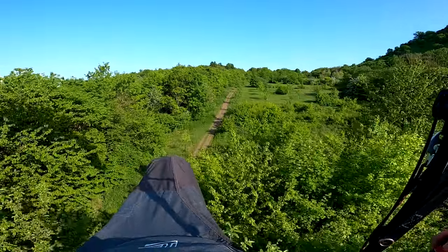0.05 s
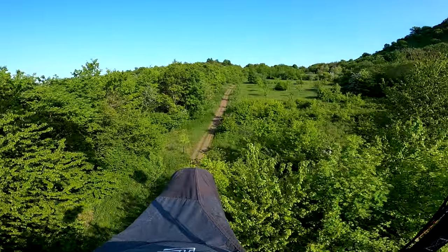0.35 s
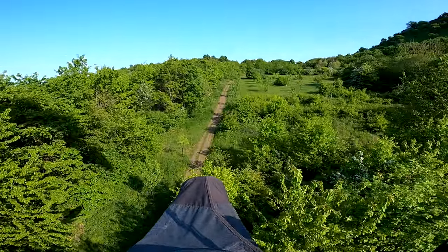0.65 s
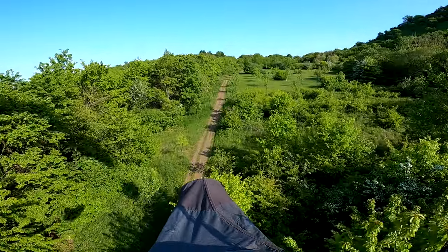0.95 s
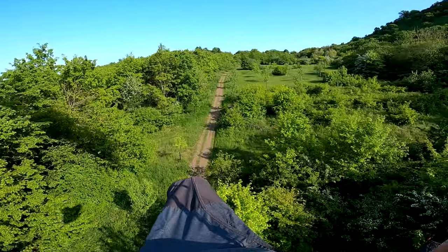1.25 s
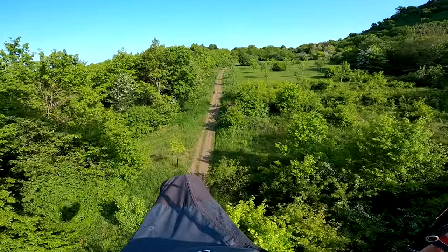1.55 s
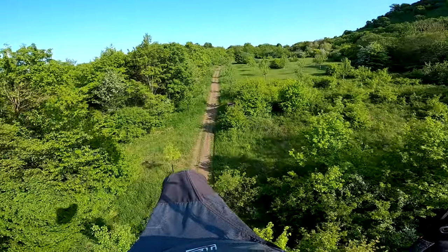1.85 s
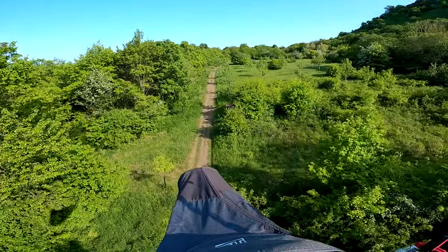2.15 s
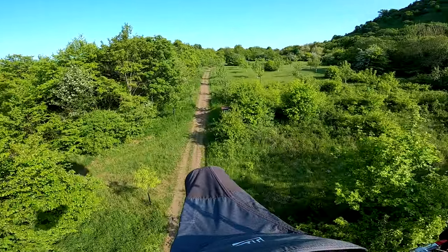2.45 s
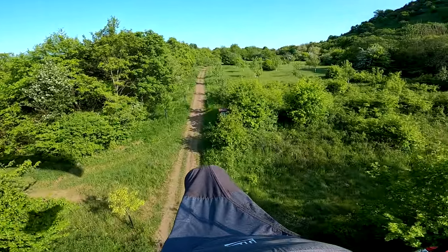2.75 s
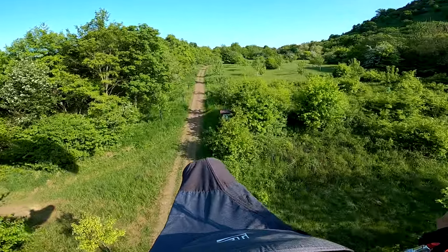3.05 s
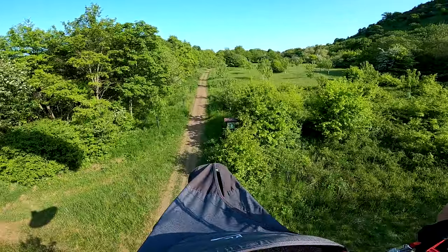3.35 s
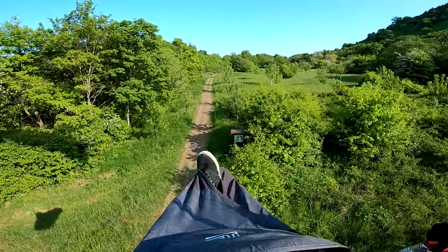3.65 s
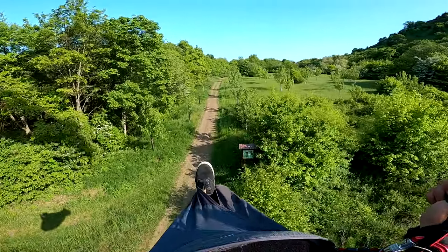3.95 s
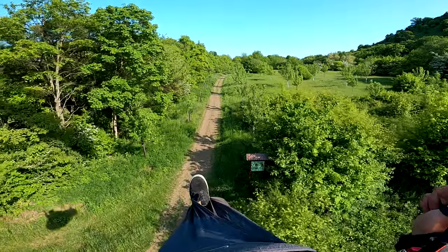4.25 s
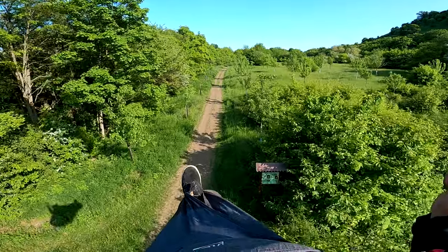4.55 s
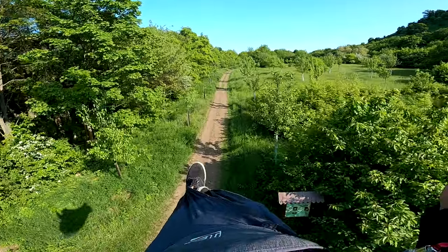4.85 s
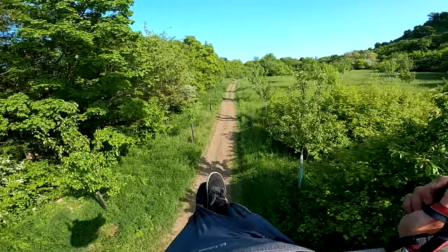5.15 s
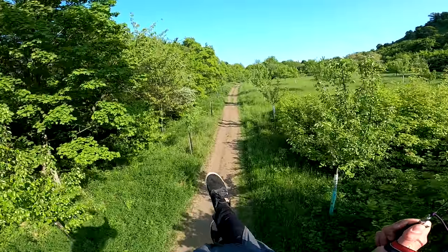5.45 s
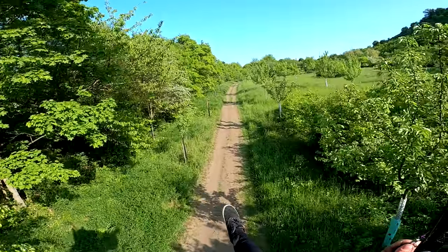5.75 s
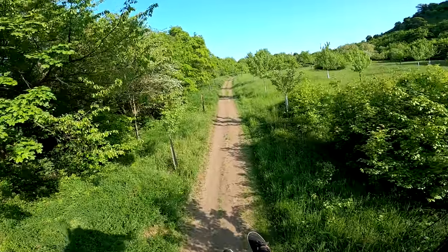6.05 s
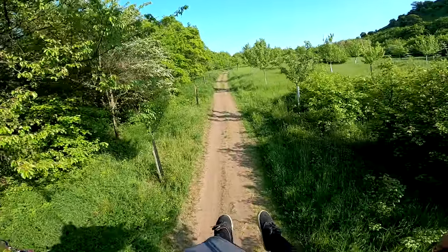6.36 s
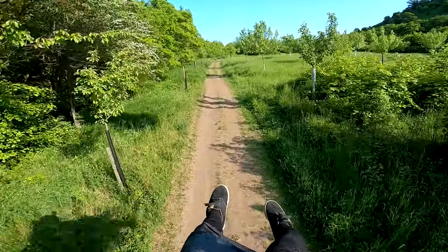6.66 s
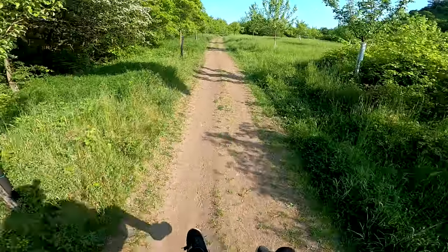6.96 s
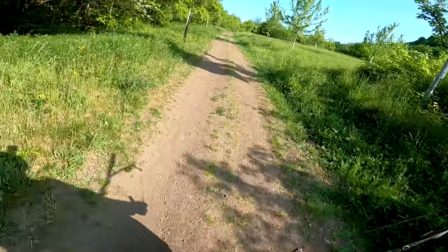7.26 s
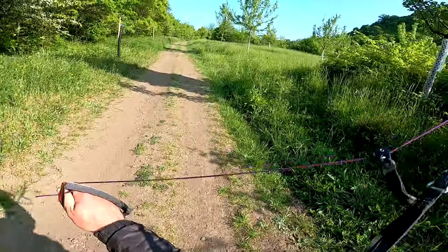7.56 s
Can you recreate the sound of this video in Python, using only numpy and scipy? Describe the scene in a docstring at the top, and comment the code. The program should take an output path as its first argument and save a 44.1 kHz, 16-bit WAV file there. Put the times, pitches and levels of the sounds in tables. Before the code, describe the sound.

Wind buffets the microphone of a low-flying paraglider, a bird chirping faintly, until harness rustling and close scuffs and bumps mark the landing.

```python
"""Wind buffets and rushes past a camera microphone worn by a paraglider pilot, low over bushes.
Eddies pump the microphone port; right beside it clothes swish, straps rasp and fittings tick.
A small bird sings faintly from the foliage below. Coming in to land on a dirt track, the pilot slides
out of the harness seat and touches down: the gear bumps and scuffs close up, and stones crunch."""
import sys
import numpy as np
from scipy import signal
from scipy.fft import rfft, irfft, next_fast_len
from scipy.io import wavfile
from scipy.ndimage import uniform_filter1d, map_coordinates

SR = 44100
rng = np.random.default_rng(int(sys.argv[2]) if len(sys.argv) > 2 else 0)


def file_out(sig):
    """Save sig as 16-bit WAV at sys.argv[1]."""
    # one column per channel
    cols = np.atleast_2d(sig).T
    # limit, then scale
    lim = np.clip(cols, -1, 1)
    pcm = np.round(lim * 32767).astype(np.int16)
    wavfile.write(sys.argv[1], SR, pcm)


N = 335601

# pressure of the flow on the microphone port: (time [s], level [dB])
BUFFET_LEVELS = [(0.0, -33), (0.55, -35.5), (0.85, -26), (1.15, -22.5), (1.6, -23.5), (1.85, -20.5),
                 (4.1, -20.5), (4.45, -27.5), (4.69, -28), (4.82, -25.5), (4.93, -25), (5.01, -23),
                 (5.09, -22), (5.15, -32), (5.19, -22.5), (5.25, -29.5), (5.42, -30.5), (5.75, -24.5),
                 (6.0, -27), (6.15, -22), (6.93, -23), (7.06, -29), (7.22, -22.5), (7.61, -28)]
# air passing the pilot: (time [s], rush [dB], wake of the body [dB])
AIR_LEVELS = [(0.0, -47.5, -49), (0.35, -46.5, -45.5), (0.72, -40, -43.5), (1.0, -40, -39),
              (1.22, -35, -34.5), (1.55, -36, -35.5), (1.95, -33.5, -36.5), (2.35, -36.5, -40),
              (2.85, -34.5, -44), (3.5, -37.5, -45.5), (4.08, -39, -45), (4.4, -42, -41.5),
              (5.05, -39.5, -37), (5.5, -39, -35), (5.8, -37, -39), (6.1, -44, -37)]
# hiss of that air: (time [s], level [dB])
HISS_LEVELS = [(0.0, -58.5), (0.35, -59.5), (1.25, -53), (1.65, -52), (1.9, -47), (2.4, -49.5),
               (3.4, -50.5), (4.05, -50.5), (4.4, -53.5), (6.1, -52.5)]
# rougher air that stirs up the eddies: (centre [s], gain [dB], half length [s])
ROUGH_AIR = [(1.3, 3.5, 0.2), (1.794, 10, 0.05), (2.596, 6, 0.16), (3.15, 6.5, 0.19), (3.695, 7.5, 0.18),
             (4.287, 6, 0.24), (4.84, 7.5, 0.04), (7.292, 10, 0.17)]
# sleeves and trouser legs: (peak [s], swish [dB], rise [s], fall [s], dull rub against swish [dB])
LIMB_MOVES = [(.75, -62.5, 0.11, 0.047, 11), (3.465, -53, 0.025, 0.095, 5), (3.93, -56, 0.18, 0.069, -9),
              (4.76, -62.5, 0.038, 0.03, 10.5), (4.91, -50, 0.079, 0.056, 5), (5.28, -61.5, .03, 0.07, 5),
              (5.41, -53, 0.052, 0.095, 3.5), (5.44, -46, 0.015, 0.014, -6), (5.7, -55.5, 0.16, 0.09, 8.5),
              (6.25, -58.5, 0.13, .3, 1)]
# buckles and lines: (time [s], level [dB], centre [Hz], width [Hz], t60 [s])
FITTING_TICKS = [(.821, -33.5, 2170, 1000, 0.011), (1.098, -52, 6360, 1400, .02),
                 (5.577, -45.5, 10200, 4000, .04), (5.757, -31.5, 2940, 1500, 0.018),
                 (6.648, -33.5, 4500, 5000, .015), (6.799, -24, 1650, 900, .012),
                 (6.864, -33, 5000, 4000, .025), (7.04, -28, 2500, 3000, 0.029),
                 (7.107, -30.5, 4140, 2500, .027), (7.14, -22, 2780, 3200, 0.011),
                 (7.1512, -15.5, 2670, 4200, 0.0063), (7.4373, -17, 3150, 3000, 0.009)]
# harness against the camera: (time [s], level [dB], starting pitch [Hz], t60 [s])
HARNESS_BUMPS = [(.348, -35.5, 850, 0.027), (5.607, -32, 845, .03), (7.2267, -17.5, 895, 0.016),
                 (7.3245, -11, 1040, 0.011), (7.469, -14, 624, 0.031), (7.529, -17, 840, 0.048),
                 (7.573, -16, 670, 0.04), (7.582, -14.5, 620, 0.041)]
# quick pulls of a strap: (centre [s], level [dB], half length [s])
STRAP_PULLS = [(0.723, -45, 0.02), (0.767, -41.5, 0.013), (5.448, -47, 0.018), (5.695, -44, .009),
               (5.844, -45, 0.0098), (6.355, -47, 0.02), (6.735, -40.5, .025), (6.803, -29.5, 0.018),
               (7.048, -34.5, .008)]
# big eddies on the port: (centre [s], level [dB], half length [s], pitch [Hz], puff against shake [dB])
BIG_EDDIES = [(1.23, -29.5, 0.011, 225.4, -1.5), (3.567, -23.5, 0.0022, 260, 0),
              (4.322, -17, 0.0061, 85, -11), (5.795, -11, 0.015, 99.55, -9.5),
              (5.955, -13.5, 0.0066, 85.5, -6), (6.971, -13.5, 0.014, 107.5, 0)]
# slurred notes from below: (time [s], level before the paths [dB], length [s], start [Hz], end [Hz])
BIRD_NOTES = [(1.519, -46, 0.023, 5100, 3480), (1.624, -51, 0.027, 4800, 3500),
              (1.742, -50, .024, 4400, 3170), (1.846, -44.5, .032, 4300, 3500),
              (1.948, -45, 0.025, 4600, 3300), (2.054, -42, .018, 4300, 2970),
              (2.152, -39.5, .019, 4500, 3300), (2.257, -45, .022, 4500, 3000),
              (2.277, -63, 0.1, 7950, 7300), (2.362, -44, .025, 4600, 3050), (2.475, -41, .02, 4550, 3310),
              (2.533, -48, 0.015, 5500, 4350), (2.579, -42, .028, 4400, 2820),
              (2.655, -47, 0.04, 2350, 3380), (3.384, -43, 0.027, 3140, 2900),
              (5.231, -44.5, 0.044, 3670, 3470), (5.254, -46, 0.033, 3410, 2690)]
# the body heaving in the harness: (peak [s], extra effort [dB], rise [s], fall [s], extra fizz [dB])
BODY_HEAVES = [(6.275, 1, 0.011, 0.024, 1.5), (6.37, 6.5, 0.026, .06, 1.5), (6.77, 7, 0.11, .12, -0.5),
               (7.05, 5, 0.023, 0.05, 1), (7.15, 6, 0.028, 0.046, 0.5), (7.48, 4, 0.05, 0.28, 0)]
# slips of a line: (time [s], level [dB], pitch [Hz])
LINE_SLIPS = [(7.025, -27, 7700), (7.041, -29, 8000), (7.055, -32, 7900), (7.066, -32, 8100),
              (7.087, -34, 8200)]
# gear dragged at touchdown: (time [s], level [dB], length [s], grit gain [dB])
LANDING_SCUFFS = [(7.225, -22.5, 0.036, -2.5), (7.255, -22.5, 0.028, -9.5), (7.285, -26, 0.033, 2.5),
                  (7.321, -24, 0.039, -22), (7.359, -29, 0.061, -9), (7.453, -25.5, 0.017, 1),
                  (7.466, -25, 0.022, -2), (7.488, -28, 0.033, -4.5), (7.513, -29, 0.034, -0.5),
                  (7.568, -23.5, 0.019, -3)]

# spectra of the air at the microphone: (frequency [Hz], relative level [dB])
BUFFET_SPECTRUM = [(10, -28), (22, -7), (33, 1.5), (47, 1), (70, -1), (95, -7.5), (130, -19), (220, -34.5),
                   (600, -90), (3000, -125)]
EDDY_SPECTRUM = [(50, -35.5), (85, 1.5), (110, 2), (150, -5.5), (185, -11), (260, -22.5), (600, -61),
                 (2000, -88.5), (8000, -125)]
WAKE_SPECTRUM = [(110, -17), (160, 2), (200, -0.5), (245, -1.5), (340, -3), (450, -14), (800, -37.5),
                 (2500, -61.5), (10000, -105)]
RUSH_SPECTRUM = [(180, -42.5), (320, -3), (450, 2), (700, -4), (1000, -7.5), (1500, -13), (2200, -21.5),
                 (4000, -38), (9000, -69), (13000, -100)]
HISS_SPECTRUM = [(600, -20), (1500, 3), (2200, 3), (3600, 2.5), (5000, -4.5), (6600, -11.5), (8000, -25.5),
                 (10000, -35), (12000, -58), (15000, -79.5)]
PUFF_SPECTRUM = [(60, -0.5), (170, 6.5), (300, -0.5), (500, -12), (1500, -38), (6000, -68)]
# spectra of cloth and gear, close up: (frequency [Hz], relative level [dB])
FLUTTER_SPECTRUM = [(2000, -6), (5000, 3), (8000, -1.5), (10000, -8.5), (12000, -27), (15000, -44)]  # nylon stirring in the wind
SWISH_SPECTRUM = [(500, -16.5), (1400, -6), (2200, -3), (3100, 7.5), (4300, 8), (5500, 3.5), (7000, 1.5),
                  (8200, -6), (9900, -2.5), (11500, -11), (14500, -25.5)]
CLOTH_SPECTRUM = [(600, -7.5), (1500, 3), (2200, -0.5), (2750, 4.5), (3500, 2), (5000, -5), (6600, -12.5),
                  (8000, -26), (10000, -30), (12000, -61)]  # the duller rub of cloth on cloth
WEBBING_SPECTRUM = [(500, -22), (1150, 7), (1620, 11.5), (1950, 1.5), (2750, 3), (3500, -2.5), (4300, -4),
                    (5500, -10), (9000, -14), (14000, -54)]
HARNESS_SPECTRUM = [(150, -29), (400, 2), (800, 0), (1400, 1.5), (2200, -2.5), (3500, -13.5), (6000, -32),
                    (12000, -57)]
FIZZ_SPECTRUM = [(1000, -8.5), (2600, -4.5), (4500, -2.5), (6200, -8), (8200, -14), (10000, -20),
                 (12000, -29.5), (15000, -39)]  # fine cloth noise
SCRAPE_SPECTRUM = [(50, -20), (120, 6), (230, 14), (380, 13.5), (700, 6.5), (1100, -15), (1800, -33),
                   (4000, -51)]
GRIT_SPECTRUM = [(300, -22), (900, -0.5), (1400, -1.5), (2300, -9.5), (3500, -13.5), (5500, -30),
                 (9000, -42), (14000, -53.5)]
# response of the covered microphone: (frequency [Hz], gain [dB])
MIC_RESPONSE = [(1000, 0.5), (10000, -0.5), (12000, -3), (14500, -6)]
BAND_LIMIT_HZ = 14950


def amp(db):
    """Decibels to gain."""
    return 10 ** (np.asarray(db) / 20)


def unit(x):
    """x at rms 1."""
    return x / np.sqrt(np.mean(x ** 2) + 1e-20)


def curves(rows):
    """One value per sample for each column after the time."""
    times, *columns = np.transpose(rows)
    return [np.interp(np.arange(N) / SR, times, column) for column in columns]


def swell(s, rise, fall):
    """A bell that rises to 1 at second s and falls again."""
    t = np.arange(N) / SR - s
    return np.exp(-(t / np.where(t < 0, rise, fall)) ** 2 / 2)


def wobble(rate):
    """A smooth random curve, rate knots a second."""
    return map_coordinates(rng.standard_normal(int(N * rate / SR) + 4), [np.arange(N) * rate / SR])


def filtered(x, response):
    """x times a response of frequency."""
    size = next_fast_len(len(x) + 8192)
    return irfft(rfft(x, size) * response(np.fft.rfftfreq(size, 1 / SR)), size)[:len(x)]


def coloured(x, spectrum):
    """x shaped by a spectrum table, at rms 1."""
    f, db = np.transpose(spectrum)
    return unit(filtered(x, lambda hz: amp(np.interp(np.log(hz + 1), np.log(f), db))))


def add(track, s, sound):
    """Mix a sound into the track from second s on."""
    part = track[round(s * SR):][:len(sound)]
    part += sound[:len(part)]


def steady_swings(spectrum, slack):
    """Low wind buffeting held fairly steady in strength, as by the camera's wind limiter."""
    swing = coloured(rng.standard_normal(N), spectrum)
    power = np.abs(uniform_filter1d(swing ** 2, size=3000))
    return unit(swing / np.sqrt(power + slack))  # more slack evens it less


def turbulence(spectrum, patchy_db):
    """Noise with patches of random gain in time and frequency."""
    cells = signal.stft(rng.standard_normal(N), nperseg=512)[2]
    patches = uniform_filter1d(rng.standard_normal(cells.shape), size=8, axis=0)
    patches = unit(uniform_filter1d(patches, size=12, axis=1))
    noise = signal.istft(cells * amp(patchy_db * patches), nperseg=512)[1][:N]
    return coloured(noise, spectrum)


def friction(spectrum, rate, smooth):
    """Tiny slips, rate a second, over smooth rubbing noise."""
    slips = (rng.random(N) < rate / SR) * rng.standard_normal(N)
    return coloured(unit(slips) + smooth * rng.standard_normal(N), spectrum)


def lulls(buffet_db):
    """A gain that dips as the flow lets go of the port for moments, deeper when the flow is weak."""
    depth_db = 2.5 + 0.54 * (buffet_db.max() - buffet_db)
    hold = amp(-depth_db * np.tanh(np.maximum(wobble(rate=28), 0) ** 2))
    return hold / np.sqrt(uniform_filter1d(hold ** 2, size=SR // 4))


def wind():
    """Eddies pump the microphone port, and each pressure swing roughens the rush of air."""
    buffet_db, = curves(BUFFET_LEVELS)
    rush_db, wake_db = curves(AIR_LEVELS)
    hiss_db, = curves(HISS_LEVELS)
    gust_db = sum(db * swell(s, half, half) for s, db, half in ROUGH_AIR)
    # small eddies follow the buffet's level, and gusts lift them
    eddy_db = buffet_db.mean() - 9.5 + 0.94 * (buffet_db - buffet_db.mean()) + gust_db
    swing = steady_swings(BUFFET_SPECTRUM, slack=0.1)
    flicker = wobble(rate=28)
    hold = lulls(buffet_db)
    eddies = amp(eddy_db) * unit(amp(2.36 * flicker) * steady_swings(EDDY_SPECTRUM, slack=0.73))
    wake = amp(wake_db) * unit(amp(0.98 * flicker) * turbulence(WAKE_SPECTRUM, patchy_db=0.3))
    rush = unit(amp(0.5 * flicker + 0.6 * swing) * turbulence(RUSH_SPECTRUM, patchy_db=0.84))
    hiss = unit(amp(0.5 * flicker + 0.55 * swing) * turbulence(HISS_SPECTRUM, patchy_db=1.0))
    return hold * (amp(buffet_db) * swing + eddies) + wake + amp(rush_db) * rush + amp(hiss_db) * hiss


def clothes():
    """Nylon near the microphone stirs in the wind and swishes, over a duller rub, as limbs shift."""
    nylon = friction(SWISH_SPECTRUM, rate=1500, smooth=1.4)
    dull = friction(CLOTH_SPECTRUM, rate=1500, smooth=0.99)
    rush_db, _ = curves(AIR_LEVELS)
    flutter_db = -66 + 0.18 * (rush_db - rush_db.mean())
    out = amp(flutter_db) * coloured(rng.standard_normal(N), FLUTTER_SPECTRUM)
    for s, db, rise, fall, dull_db in LIMB_MOVES:
        out += amp(db) * swell(s, rise, fall) * (nylon + amp(dull_db) * dull)
    return amp(wobble(rate=35)) * out


def fittings():
    """The camera mount gives one soft knock; buckles and lines snap within arm's reach."""
    knock_hz, knock_t60 = 385, 0.043
    t, out = np.arange(SR // 8) / SR, np.zeros(N)
    add(out, 0.113, amp(-23.5 - 60 * t / knock_t60) * np.sin(2 * np.pi * knock_hz * t))
    for s, db, hz, width, t60 in FITTING_TICKS:
        decay = amp(-60 * t / t60)
        burst = decay * rng.standard_normal(len(t))
        # a dry snap has no pitch of its own: all frequencies are struck alike
        flat_spectrum = np.exp(1j * np.angle(rfft(burst)))
        contact = np.sqrt(decay) * irfft(flat_spectrum, len(t))
        edges = np.clip([hz - width / 2, hz + width / 2], 80, BAND_LIMIT_HZ)
        tick = signal.sosfilt(signal.butter(3, edges, "bandpass", fs=SR, output="sos"), contact)
        # the blow sets the energy of the tick, whatever its fine shape
        add(out, s, amp(db) * np.sqrt(np.mean(decay ** 2)) * unit(tick))
    return out


def harness_bumps():
    """The harness bumps the camera itself: a crack, and a thud whose pitch sags as the padding gives."""
    sag_share, sag_s, crack_db, crack_t60 = 0.64, 0.0079, -16.5, 0.0086
    t, out = np.arange(SR // 16) / SR, np.zeros(N)
    sag = 1 - sag_share * (1 - np.exp(-t / sag_s))
    for s, db, hz, t60 in HARNESS_BUMPS:
        phase = 2 * np.pi * np.cumsum(hz * sag) / SR
        thud = amp(-60 * t / t60) * np.sin(phase)
        crack = amp(crack_db - 60 * t / crack_t60) * coloured(rng.standard_normal(len(t)), GRIT_SPECTRUM)
        add(out, s, amp(db) * (thud + crack))
    return out


def straps():
    """Webbing is drawn over cloth close by, and rasps as its weave catches and lets go."""
    rasp_hz, rasp_db = 66, 2.6
    speed = sum(amp(db) * swell(s, half, half) for s, db, half in STRAP_PULLS)
    catch_hz = rasp_hz * np.exp(0.25 * wobble(rate=40))
    catches = np.sin(2 * np.pi * np.cumsum(catch_hz) / SR)
    return speed * unit(amp(rasp_db * catches) * friction(WEBBING_SPECTRUM, rate=1600, smooth=0.56))


def eddy_thumps():
    """A big eddy hits the port and shakes it for a few uneven, lopsided cycles, with a puff of air."""
    out = np.zeros(N)
    puff = coloured(rng.standard_normal(N), PUFF_SPECTRUM)
    waver = np.exp(0.14 * wobble(rate=70))
    for s, db, half, hz, puff_db in BIG_EDDIES:
        phase = 2 * np.pi * np.cumsum(hz * waver) / SR
        shake = np.sin(phase) + 0.2 * np.sin(2 * phase)
        out += amp(db) * swell(s, half, half) * (shake + amp(puff_db) * puff)
    return out


def bird():
    """Down in the bushes, a run of steeply falling notes ends in a flourish; stray calls follow."""
    blur_hz, direct_gain = 70, 0.56
    ground_delay_s, ground_db, foliage_db, foliage_t60 = 0.015, -13, -8.5, 0.1
    t, out = np.arange(SR // 4) / SR, np.zeros(N)
    for s, db, length, start_hz, end_hz in BIRD_NOTES:
        progress = np.linspace(0, 1, round(length * SR))
        phase = 2 * np.pi * np.cumsum(start_hz * (end_hz / start_hz) ** progress) / SR
        # moving air smears the pitch on the way up to the microphone
        drift = filtered(rng.standard_normal(len(t)), lambda hz: np.exp(-(hz / 400) ** 2))[:len(phase)]
        phase += np.cumsum(drift) * np.sqrt(2 * np.pi * blur_hz / SR)
        note = amp(db) * np.sqrt(np.abs(np.sin(np.pi * progress))) * np.sin(phase)
        # the foliage scatters each note along new paths
        paths = rng.standard_normal(len(t)) * amp(-60 * t / foliage_t60)
        add(out, s, direct_gain * note)
        add(out, s + ground_delay_s, amp(ground_db) * note)
        add(out, s, amp(foliage_db) * signal.fftconvolve(note, paths / np.linalg.norm(paths)))
    return out


def harness_slide():
    """The pilot leaves the seat: webbing and cloth drag in jerks, harder as the leg straps take weight."""
    start_s, attack_s, effort_db_per_s = 6.24, 0.023, 4.5
    t = np.arange(N) / SR - start_s
    heave_db = sum(db * swell(s, rise, fall) for s, db, rise, fall, _ in BODY_HEAVES)
    bright_db = sum(db * swell(s, rise, fall) for s, _, rise, fall, db in BODY_HEAVES)
    effort_db = effort_db_per_s * t + heave_db
    jerk_db = wobble(rate=60)
    rub = amp(-45 + effort_db + jerk_db) * friction(HARNESS_SPECTRUM, rate=990, smooth=1.0)
    fizz_db = -45.5 + 0.55 * effort_db + bright_db + jerk_db
    fizz = amp(fizz_db) * friction(FIZZ_SPECTRUM, rate=870, smooth=2.9)
    return np.clip(t / attack_s, 0, 1) * (rub + fizz)


def line_squeaks():
    """A line slips in a few quick, high squeaks just before touchdown."""
    half_width_hz, attack_s, t60 = 750, 0.0027, 0.026
    t, out = np.arange(SR // 16) / SR, np.zeros(N)
    for s, db, hz in LINE_SLIPS:
        band = filtered(rng.standard_normal(len(t)), lambda f: np.exp(-((f - hz) / half_width_hz) ** 2))
        envelope = amp(db - 60 * t / t60) * (1 - np.exp(-t / attack_s))
        add(out, s, envelope * unit(band))
    return out


def landing_scuffs():
    """Each jolt on the dirt track drags the gear: a close, dull scrape with grit and crunching stones."""
    attack_s = 0.0025
    t, out = np.arange(N) / SR, np.zeros(N)
    scrape = friction(SCRAPE_SPECTRUM, rate=3000, smooth=0.7)
    grit = amp(-3) * friction(GRIT_SPECTRUM, rate=1500, smooth=0.9) + amp(-4.5) * gravel()
    for s, db, length, grit_db in LANDING_SCUFFS:
        age = np.maximum(t - s, 0)
        stroke = np.minimum(age / attack_s, 1) * np.exp(-(age / length) ** 4)
        out += amp(db) * stroke * (scrape + amp(grit_db) * grit)
    return out


def gravel():
    """Small stones on the track grind together, each ringing for a few cycles."""
    stones_per_s, centre_hz, log_spread, ring_cycles = 2600, 1150, 0.38, 6
    t = np.arange(SR // 100) / SR
    starts = np.flatnonzero(rng.random(N) < stones_per_s / SR)
    pitch, size = rng.standard_normal((N, 2))[starts].T
    stone_hz = centre_hz * np.exp(log_spread * np.clip(pitch, -2, 2))
    cycles = stone_hz[:, None] * t
    grains = np.tanh(size)[:, None] * amp(-60 * cycles / ring_cycles) * np.sin(2 * np.pi * cycles)
    positions = starts[:, None] + np.arange(len(t))
    return unit(np.bincount(positions.ravel(), grains.ravel(), N)[:N])


def scene():
    """One microphone on the pilot's body: air on the port, gear close by, the bird below."""
    air = wind() + eddy_thumps()
    fabric = clothes() + harness_slide() + straps()
    gear = landing_scuffs() + harness_bumps() + fittings() + line_squeaks()
    return (air + fabric + gear + bird())[None]


def record(dry):
    """The covered microphone dulls the top, and the camera keeps nothing above its band limit."""
    f, db = np.transpose(MIC_RESPONSE)
    return np.array([filtered(channel, lambda hz: amp(np.interp(hz, f, db)) * (hz < BAND_LIMIT_HZ))
                     for channel in dry])


dry = scene()
out = record(dry)
file_out(out)
```